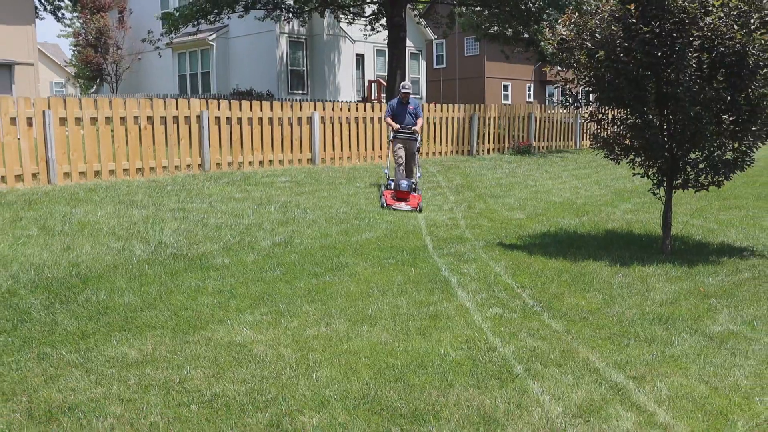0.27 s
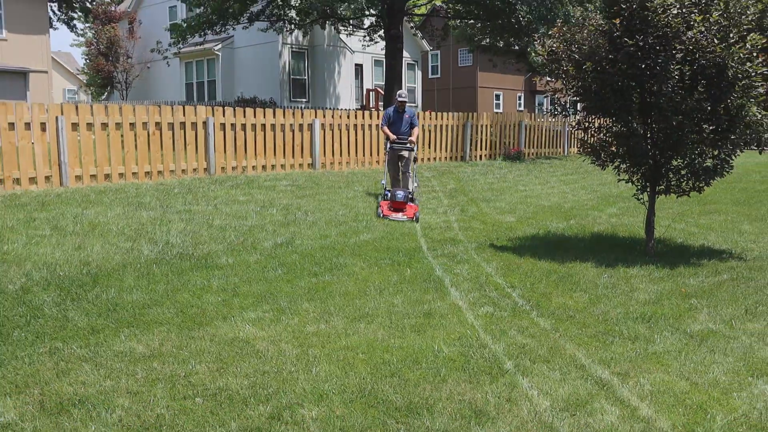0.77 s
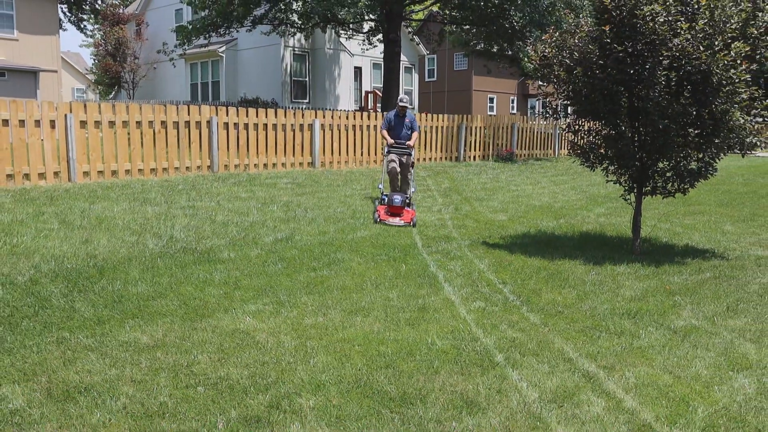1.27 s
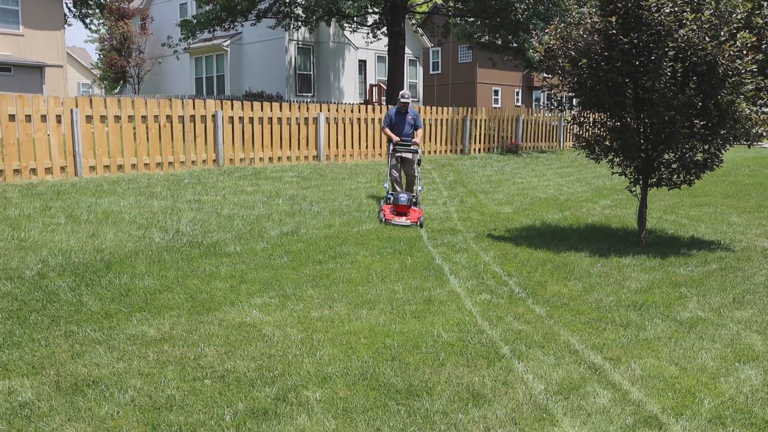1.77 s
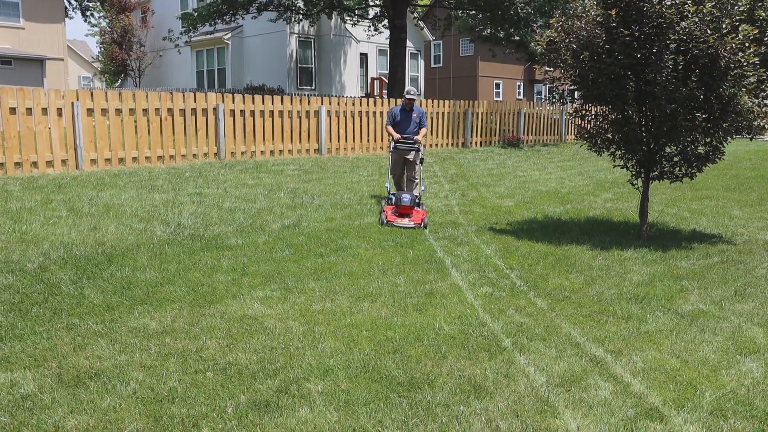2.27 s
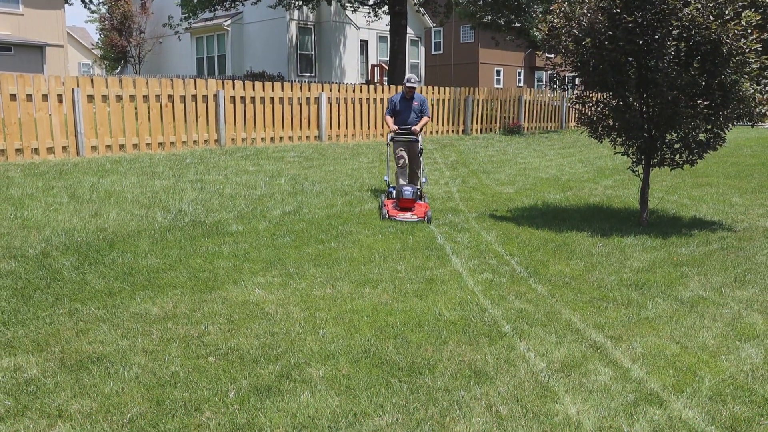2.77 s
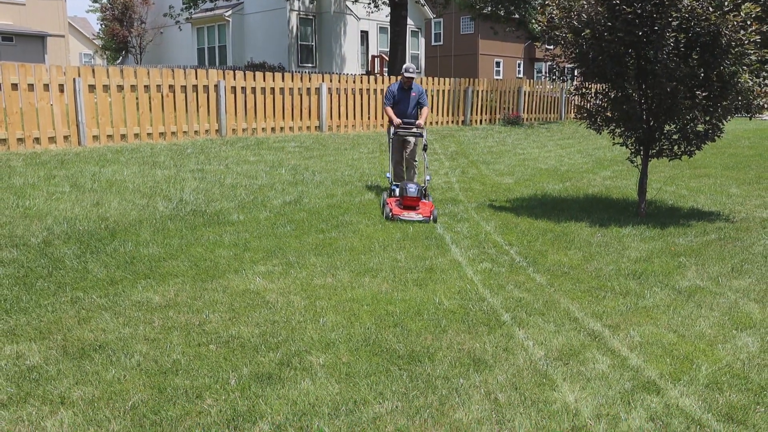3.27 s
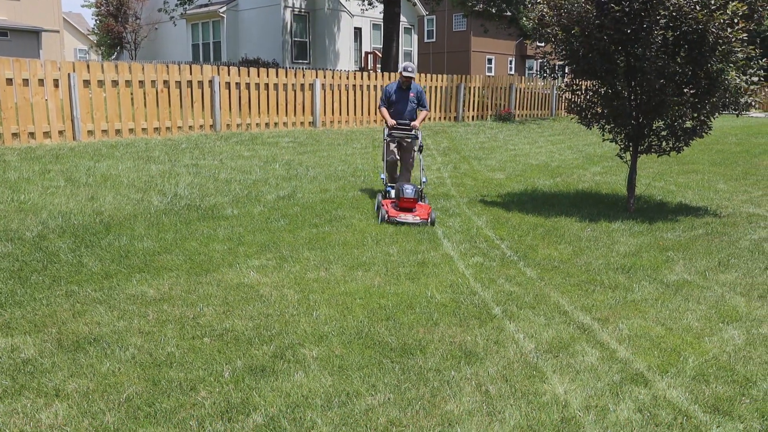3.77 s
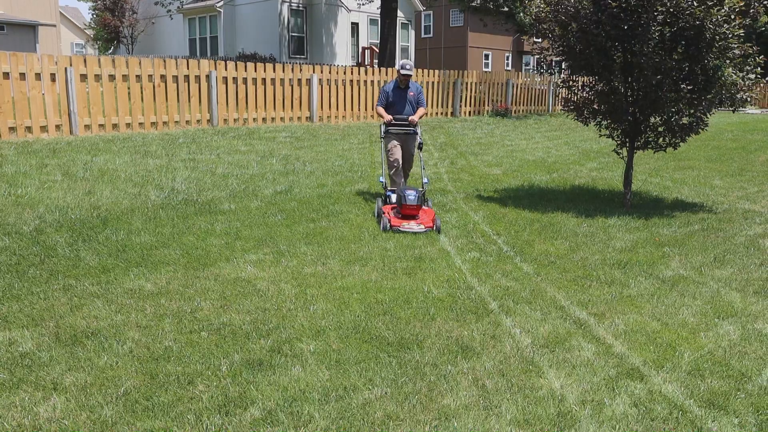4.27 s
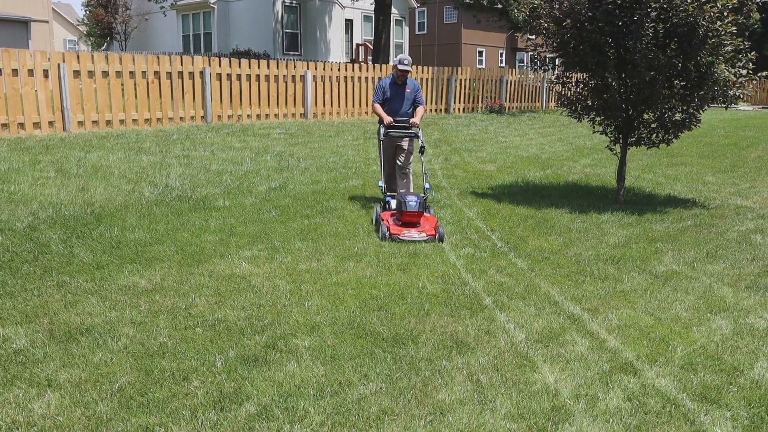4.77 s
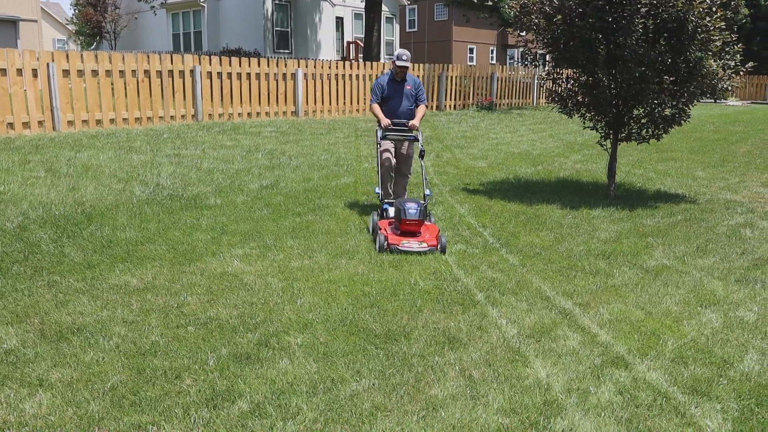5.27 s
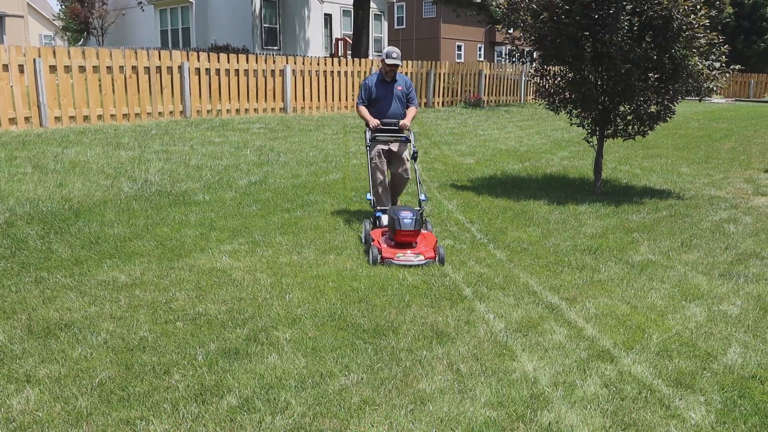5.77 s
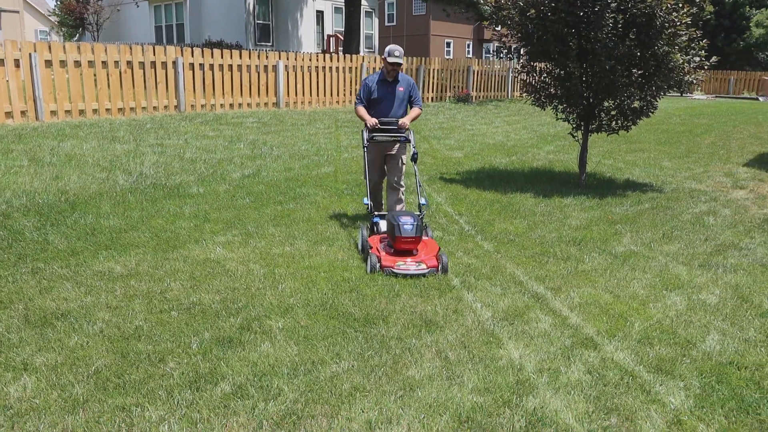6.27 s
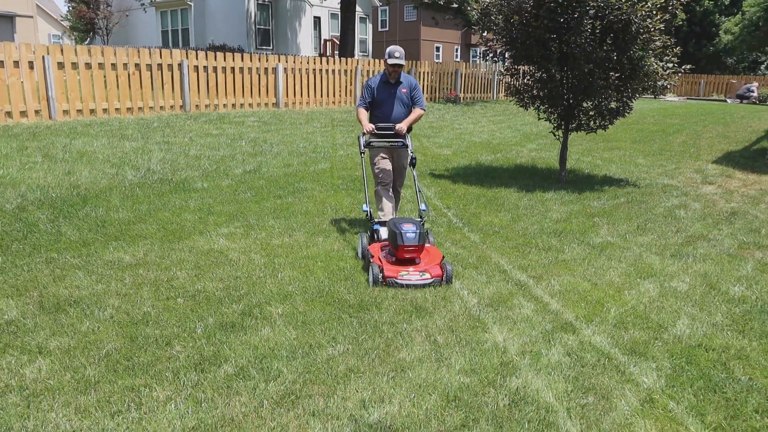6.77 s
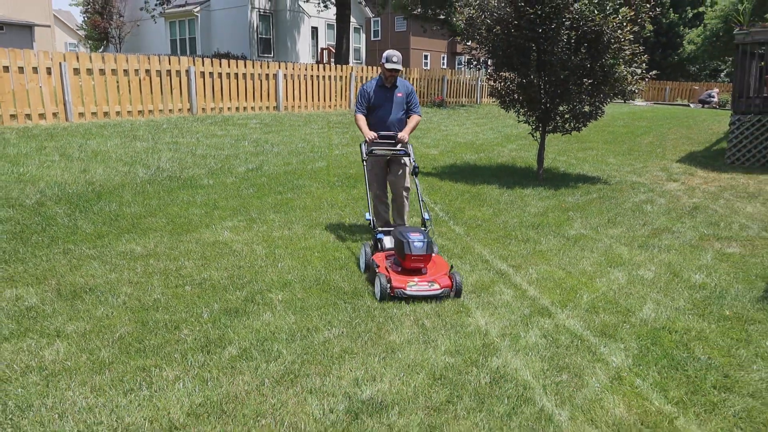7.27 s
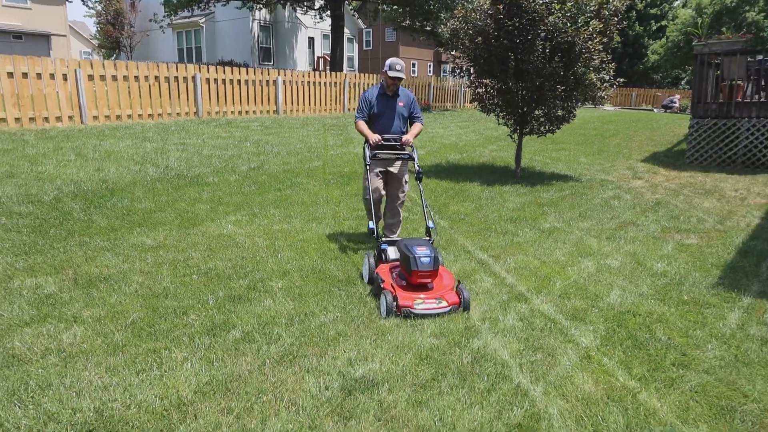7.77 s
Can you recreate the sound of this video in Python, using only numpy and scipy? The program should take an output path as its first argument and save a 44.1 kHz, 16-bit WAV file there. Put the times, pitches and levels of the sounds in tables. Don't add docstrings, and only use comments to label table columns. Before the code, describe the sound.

Outdoors on a lawn, one fixed microphone hears an electric mower approach: low blade hum, singing whine, hollow roar from the deck and airy hiss from the chute. Early on, deep gusts buffet the microphone and a far engine hums, sinking in pitch. Later the wind eases and the mower grows louder and brighter, with brief swells in thicker grass and soft, sharp twig cracks. It is still running at the end.

```python
import sys
import numpy as np
from scipy import signal
from scipy.fft import rfft, irfft, next_fast_len
from scipy.io import wavfile
from scipy.ndimage import uniform_filter1d, map_coordinates

SR = 44100
rng = np.random.default_rng(int(sys.argv[2]) if len(sys.argv) > 2 else 0)


def int16_out(signal):
    q = np.round(np.clip(np.atleast_2d(signal).T, -1, 1) * 32767)
    wavfile.write(sys.argv[1], SR, q.astype(np.int16))


def invert_db(level):
    return 10 ** (np.asarray(level, dtype=float) / 20)


N = 353682

# start in seconds [s], peak level [dB].
TWIG_HITS = [(1.0301, -42), (1.3496, -46), (3.4455, -40), (4.1094, -47), (4.3694, -47), (5.6094, -42),
             (6.039, -39), (6.4492, -52), (7.1496, -52), (7.3945, -41), (7.4072, -41)]


def unit(x):
    return x / np.sqrt(np.mean(x ** 2) + 1e-20)


def curves(rows):
    seconds, *columns = np.transpose(rows)
    return [np.interp(np.arange(N) / SR, seconds, column) for column in columns]


def wobble(rate):
    coarse = np.arange(0, N + 32, 32)
    knots = rng.standard_normal(int(N * rate / SR) + 4)
    return np.interp(np.arange(N), coarse, map_coordinates(knots, [coarse * rate / SR]))


def swells(rows, size):
    t = np.arange(0, N + 64, 64) / SR
    bells = np.zeros(len(t))
    for start, value, half in rows:
        bells += size(value) * np.cosh(1.12 * np.clip((t - start) / half, -50, 50)) ** -2.
    return np.interp(np.arange(N) / SR, t, bells)


def coloured(x, spectrum):
    length = next_fast_len(N + 8192)
    hz, db = np.transpose(spectrum)
    log_hz = np.log(np.fft.rfftfreq(length, 1 / SR) + 1)
    gain = invert_db(np.interp(log_hz, np.log(hz + 1), db, -120, -120))
    return unit(irfft(rfft(x, length) * gain, length)[:N])


def rush(spectrum, patchy_db, grain_db=0):
    grains = invert_db(grain_db * np.repeat(rng.standard_normal(N // 40 + 20), 40)[:N + 512])
    z = signal.stft(grains * rng.standard_normal(N + 512), nperseg=512)[2]
    field = uniform_filter1d(rng.standard_normal(z.shape), size=8, axis=0)
    field = uniform_filter1d(field, size=8, axis=1)
    patchy = signal.istft(z * invert_db(patchy_db * unit(field)), nperseg=512)[1][:N]
    return coloured(patchy, spectrum)


def drone():
    # time in seconds [s], pitch [Hz], level [dB].
    engine = [
        (0, 107, -52),
        (1.1, 104.4, -52),
        (1.5, 106, -64),
        (2.1, 105.5, -49),
        (3, 104.6, -41.5),
        (4.1, 100.4, -48),
        (4.5, 97, -61),
        (6.2, 100.6, -62),
        (7.4, 101.9, -69),
        (8.02, 102, -53),
    ]
    hz, db = curves(engine)
    return np.sqrt(2) * invert_db(db) * np.sin(2 * np.pi * np.cumsum(hz) / SR)


def wind():
    # middle in seconds [s], depth [dB], swing rate [Hz].
    thumps = [(1.531, -13.5, 51.93), (1.664, -11, 47.6), (1.711, -27, 23.0), (1.743, -16, 34.0),
              (1.773, -10.5, 44.4), (1.865, -22.5, 47.0), (2.033, -23, 32.0), (2.34, -17.5, 40.8),
              (2.53, -18, 35.0), (2.581, -21, 29.0), (2.665, -11, 40.3), (2.743, -18, 45.0),
              (2.837, -12, 34.02), (4.228, -16, 35.0), (4.26, -13, 31.7), (4.291, -17, 30.06)]
    # middle in seconds [s], strength [dB], half length in seconds [s].
    gusts = [(.07, -32, 0.054), (.3, -35, 0.14), (.6, -44, .06), (.82, -48, 0.073), (1.22, -28, 0.061),
             (1.42, -26.5, 0.08), (1.55, -23, 0.036), (1.72, -21.5, 0.1), (1.88, -29, .05),
             (2.04, -24, 0.093), (2.23, -28, 0.043), (2.36, -26, 0.079), (2.6, -25.5, 0.15),
             (2.86, -21, 0.11), (3.13, -33, 0.094), (3.27, -36, .07), (3.47, -37, .05), (3.9, -25.5, 0.032),
             (4.11, -26, 0.04), (4.28, -25.5, 0.14), (4.53, -40, 0.076), (4.88, -30.5, 0.21),
             (5.3, -33, 0.069), (5.63, -27, .18), (6, -38, .08), (6.36, -32, 0.054), (6.5, -28, .03),
             (6.68, -39, .05), (6.92, -44, .14), (7.3, -42, .08)]
    # frequency [Hz], level [dB per Hz].
    rumble_colour = [(8, -8), (18, -7), (30, 1), (45, -7), (65, -15.5), (100, -18.5), (150, -25.5),
                     (300, -49)]
    eddies = np.zeros(N + SR)
    calm_db = np.zeros(N + SR)
    reach = SR // 20
    t = np.arange(-reach, reach) / SR
    for middle, db, hz in thumps:
        bell = np.exp(-(t * hz / 0.47) ** 2)
        first = round(middle * SR) - reach
        eddies[first:][:len(t)] -= invert_db(db) * np.cos(2 * np.pi * hz * t) * bell
        calm_db[first:][:len(t)] -= 2.2 * bell
    strength = invert_db(-48) + swells(gusts, size=invert_db)
    rumble = unit(invert_db(0.27 * wobble(3.5)) * rush(rumble_colour, patchy_db=-1.3))
    return eddies[:N] + strength * invert_db(calm_db[:N]) * rumble


def twigs():
    # frequency [Hz], level [dB per Hz].
    twig_colour = [(700, -30), (1500, 4), (4000, -11), (7000, 13), (13000, 1)]
    envelope = np.zeros(N + SR)
    t = np.arange(SR // 20) / SR
    for start, db in TWIG_HITS:
        fade = invert_db(db - 3.5 - 60 * t / .035)
        envelope[round(start * SR):][:len(t)] += fade * (1 - np.exp(-t / .0012))
    return envelope[:N] * coloured(rng.standard_normal(N), twig_colour)


def pumped(noise, turn, depth, lag):
    pump = 1 + depth * np.cos(turn - lag) + 0.5 * depth * np.cos(2 * turn - lag)
    return unit(pump * noise)


def deck_roar(turn, nearer_db, tuft_db):
    # frequency [Hz], level [dB per Hz].
    roar_colour = [(60, -11), (110, -11), (200, -5), (400, -3), (520, -7), (700, -2.5), (850, 1.5),
                   (1050, -7), (1400, -17), (2200, -86)]
    level_db = -33 + 1.18 * nearer_db + 0.2 * tuft_db + 0.86 * wobble(9)
    return invert_db(level_db) * pumped(rush(roar_colour, patchy_db=.9, grain_db=1.7), turn, .13, .5)


def air_draught(turn, nearer_db, tuft_db, load):
    # frequency [Hz], level [dB per Hz].
    draught_colour = [(700, -48), (1100, -0.5), (1500, -1), (2200, -2), (3100, -3.5), (3700, -7),
                      (4300, -12), (5500, -31)]
    level_db = -39.5 + nearer_db + 0.38 * tuft_db + 0.27 * load
    return invert_db(level_db) * pumped(rush(draught_colour, patchy_db=0.52, grain_db=1.1), turn, .04, 3.2)


def chute_blast(turn, nearer_db, tuft_db, load):
    # frequency [Hz], level [dB per Hz].
    far_colour = [(3600, -30), (4200, -5), (4700, 1.5), (5200, -6.5), (5650, -10.5), (6000, -16),
                  (6500, -22)]
    # frequency [Hz], level [dB per Hz].
    near_colour = [(3600, -30), (4200, -2), (4700, 5.5), (5300, -1.5), (5750, -1), (6100, -21), (6600, -34)]
    near = np.linspace(0, np.pi / 2, N)
    blast = np.cos(near) * rush(far_colour, patchy_db=2.5, grain_db=4.0)
    blast += np.sin(near) * rush(near_colour, patchy_db=2.5, grain_db=4.0)
    level_db = -52 + 1.07 * nearer_db + 0.43 * tuft_db + 0.51 * wobble(14) + .5 * load
    return invert_db(level_db) * pumped(blast, turn, .05, 1.4)


def cut_grass(turn, nearer_db, tuft_db, load):
    # frequency [Hz], level [dB per Hz].
    grass_colour = [(2500, -32), (5000, -5.5), (6500, 1), (9000, -2.5), (10200, -3), (11500, -2),
                    (13300, -7.5)]
    snips = rng.standard_normal(N) * invert_db(4.5 * rng.standard_normal(N))
    hiss = coloured(snips, grass_colour) + 1.2 * rush(grass_colour, patchy_db=0.2)
    long_grass_s, entry_s = 3, 0.14
    longer_db = 0.7 * np.tanh((np.arange(N) / SR - long_grass_s) / entry_s)
    level_db = -59 + 0.45 * nearer_db + longer_db + tuft_db + .5 * wobble(22) + 1.0 * load
    return invert_db(level_db) * pumped(hiss, turn, .02, .9)


def blade_and_motor(turn):
    # time in seconds [s], level [dB].
    hum_points = [(0.0, -33), (0.02, -36), (1.67, -32), (1.76, -39.5), (1.96, -33.5), (2.05, -34),
                  (4.82, -30.5), (4.89, -40), (5.0, -30), (5.6, -28), (5.69, -32.5), (5.85, -28.5),
                  (5.99, -35.5), (6.08, -21), (6.14, -30), (6.77, -27.5), (7.89, -27.5), (8.02, -31)]
    # multiple of the beat, mean level [dB], growth [dB per dB of slow hum rise],
    # share of the hum's quick tilts, rocking of its own [dB].
    strong_tones = [(1, -43, .4, 0, .8), (2, -35.3, 1.4, .1, 1.1), (3, -31, 1.0, .9, .5),
                    (4, -40.8, 1.2, .1, 3.6), (5, -36.3, 1.3, .1, 1.8)]
    # multiple of the beat, strong multiple it follows, level against that one [dB].
    weak_tones = [(6, 5, -7), (7, 5, -15), (8, 5, -19.5), (9, 12, -12), (10, 12, -19), (11, 12, -16)]
    # time in seconds [s], level of its tone [dB].
    motor_strain = [(0, -45), (.35, -38), (.6, -46), (.9, -38.5), (1.4, -44.5), (1.65, -35.5), (1.95, -43),
                    (2.4, -39.5), (2.75, -37), (3.3, -38), (3.95, -37.5), (4.2, -33), (4.7, -38),
                    (5.1, -35), (5.6, -34), (6.5, -34), (7.3, -34), (8.02, -33.5)]
    rocks_hz = 8
    hum_db = curves(hum_points)[0]
    hum_db = hum_db - np.mean(hum_db)
    rise_db = uniform_filter1d(hum_db, size=66150)
    levels = {}
    for k, db, grows, share, rocks in strong_tones:
        levels[k] = db + grows * rise_db + share * (hum_db - rise_db) + rocks * wobble(rocks_hz)
    levels[12] = curves(motor_strain)[0] + .6 * wobble(rocks_hz)
    for k, leader, db in weak_tones:
        levels[k] = levels[leader] + db + 2.6 * wobble(19)
    total = np.zeros(N)
    for k, db in levels.items():
        phase = 0
        if k == 1:
            phase = np.pi / 2
        elif 4.5 < k < 12:
            phase = np.pi
        size = np.sqrt(2) * invert_db(db + 1.1 * wobble(16))
        total += size * np.cos(k * turn + phase + 0.11 * wobble(12))
    return total


def mower():
    # time in seconds [s], blade beats a second [Hz].
    blade_speed = [(0, 76.65), (.3, 76.65), (.65, 77.15), (1, 76.75), (1.25, 76.5), (1.7, 76.82),
                   (2.2, 76.6), (2.6, 76.87), (3.1, 76.35), (3.55, 76.82), (4.05, 76.33), (4.5, 76.7),
                   (4.8, 77), (5.1, 76.73), (6.9, 76.76), (7.15, 76.5), (7.5, 76.9), (8.02, 76.9)]
    # time in
    # seconds [s], loudness [dB].
    approach = [(0.0, -44), (0.04, -44), (0.18, -41), (0.69, -42.5), (1.72, -40), (1.76, -44), (2.46, -40),
                (2.63, -42.5), (3.24, -39), (4.96, -38.5), (6.57, -35.5), (7.35, -35), (7.39, -32),
                (7.53, -35), (7.95, -36.5), (8.02, -36)]
    # middle in seconds [s], swell [dB], half length in seconds [s].
    tufts = [(.24, 1.5, .09), (.95, 2.5, 0.11), (1.45, 0, 0.054), (1.68, 1, .05), (2.2, 2, 0.059),
             (3.37, 4, 0.044), (3.57, 2, 0.067), (4.2, 2.5, 0.18), (4.36, 2, .03), (4.5, 2.5, 0.044),
             (4.9, 3.5, .09), (5.2, 3, .03), (5.36, 2.5, .04), (5.61, 3.5, .035), (6.2, 1.5, .03),
             (6.45, 4.5, 0.029), (6.79, 3.5, 0.033), (6.93, 1, 0.054), (7.56, 0.5, .04)]
    turn = 2 * np.pi * np.cumsum(curves(blade_speed)[0]) / SR
    nearer_db = curves(approach)[0]
    nearer_db = nearer_db - np.mean(nearer_db)
    tuft_db = swells(tufts, size=float)
    load = wobble(28)
    air = deck_roar(turn, nearer_db, tuft_db) + air_draught(turn, nearer_db, tuft_db, load)
    clippings = chute_blast(turn, nearer_db, tuft_db, load) + cut_grass(turn, nearer_db, tuft_db, load)
    return blade_and_motor(turn) + air + clippings


def scene():
    return np.tile(drone() + wind() + twigs() + mower(), (2, 1))


def noise_fill(mono, apart_db, kept, short):
    band_edges = [196, 216, 240, 264, 292, 320, 352, 384, 416, 448, 476]
    z = signal.stft(mono, nperseg=2048)[2]
    fresh = signal.stft(rng.standard_normal((2, N)), nperseg=2048)[2]
    whole = rng.random(z.shape[1]) > short
    hit_frames = np.round(np.transpose(TWIG_HITS)[0] * SR / 1024).astype(int)
    whole[hit_frames] = False
    pair = np.array([z, 0 * z])
    for k, (a, b) in enumerate(zip(band_edges, band_edges[1:])):
        fill = whole & (rng.random(len(whole)) > kept * .6 ** k + .06)
        level = np.linalg.norm(z[a:b], axis=0) / np.linalg.norm(fresh[0, a:b], axis=0)
        filled = fresh[:, a:b] * level * invert_db([[[.3]], [[apart_db]]])
        pair[:, a:b] = np.where(fill, filled, pair[:, a:b])
    return signal.istft(pair, nperseg=2048)[1][:, :N]


def low_pass(x):
    return signal.sosfilt(signal.butter(12, 13640, fs=SR, output="sos"), x)


def record(dry):
    mid, apart = noise_fill(dry.mean(0), apart_db=-2.0, kept=.4, short=.06)
    low = coloured(rng.standard_normal(N), [(15, -9), (60, -3.5), (300, -19.5), (1500, -36.5), (4200, -44)])
    high = coloured(rng.standard_normal(N), [(4200, 0), (10500, -4), (13000, -9)])
    loudness = np.sqrt(abs(uniform_filter1d(mid ** 2, size=8192)))
    apart = apart + invert_db(-37) * loudness * low * (wobble(20) > .4)
    apart = apart + invert_db(-88 + 3.5 * wobble(25)) * high
    both = np.array([mid + apart, mid - apart])
    top_hz = 13150
    both = irfft(rfft(both) * (np.fft.rfftfreq(N, 1 / SR) < top_hz), N)
    return low_pass(both)


dry = scene()
out = record(dry)
int16_out(out)
```